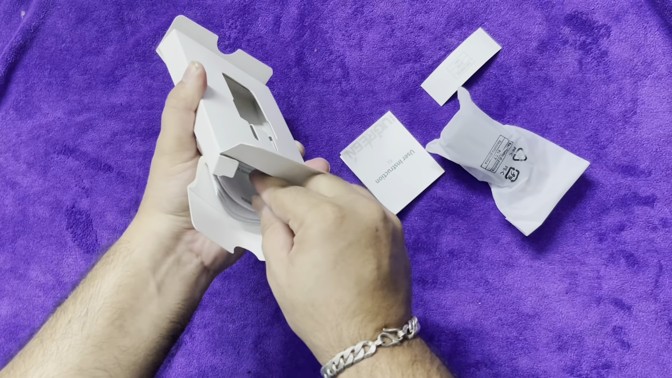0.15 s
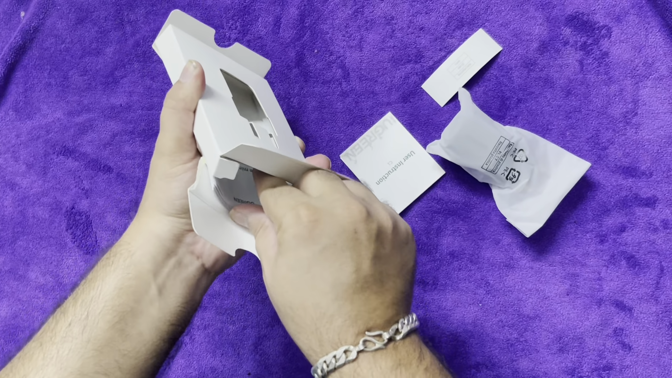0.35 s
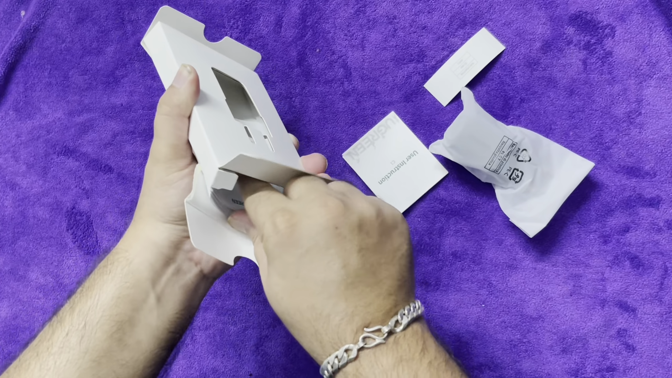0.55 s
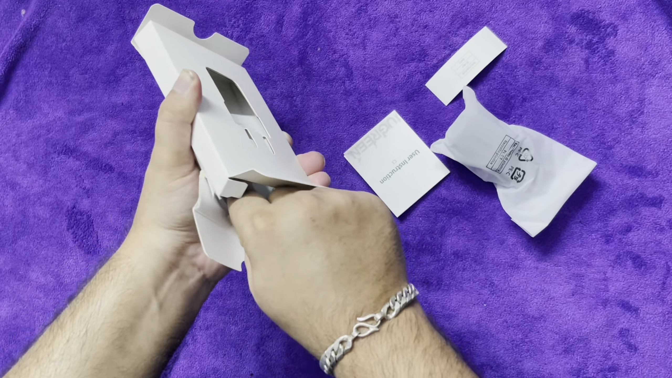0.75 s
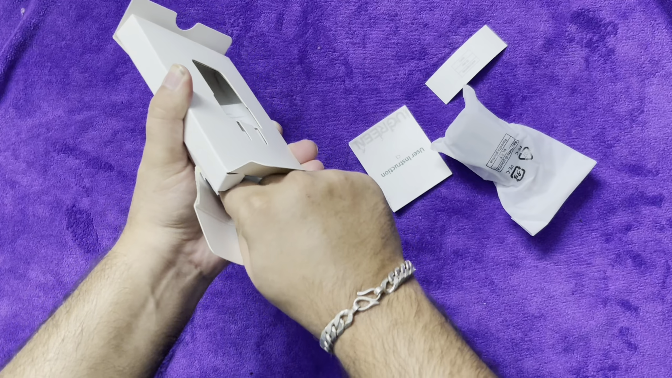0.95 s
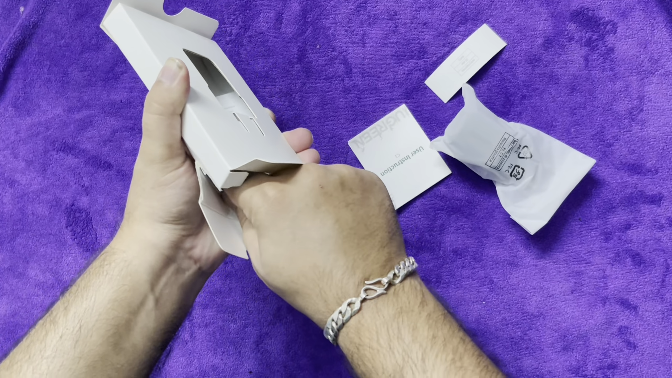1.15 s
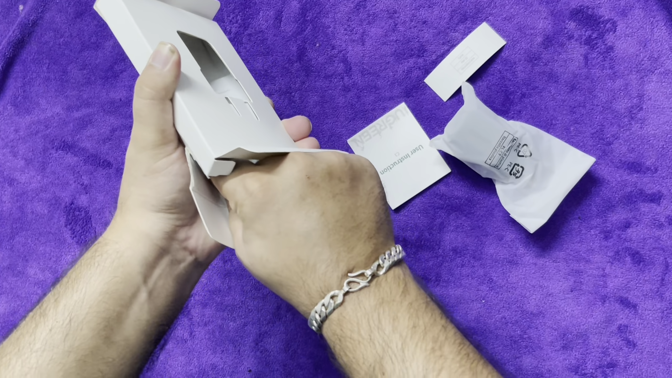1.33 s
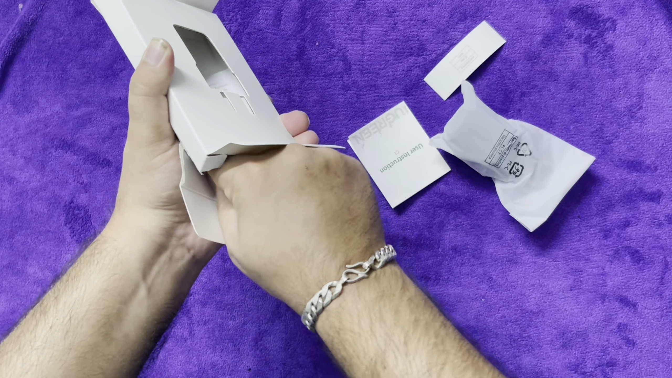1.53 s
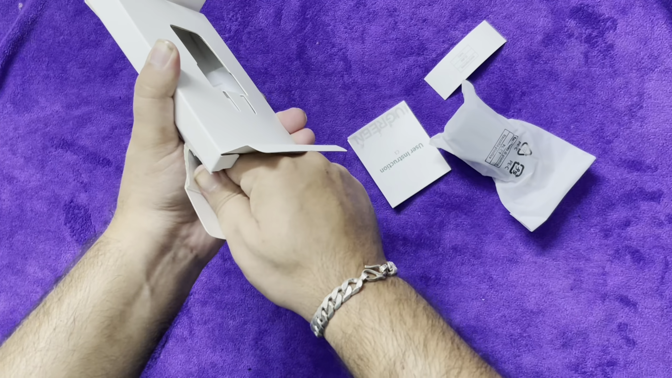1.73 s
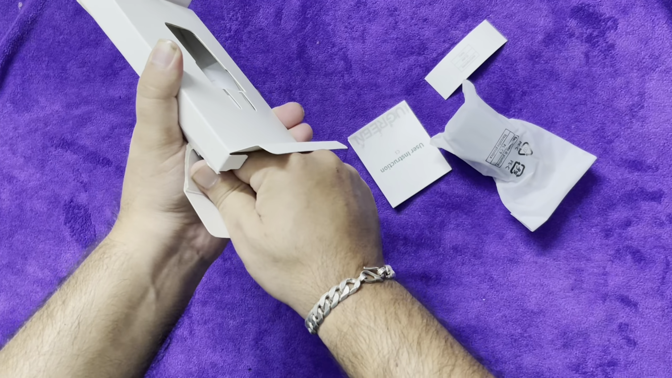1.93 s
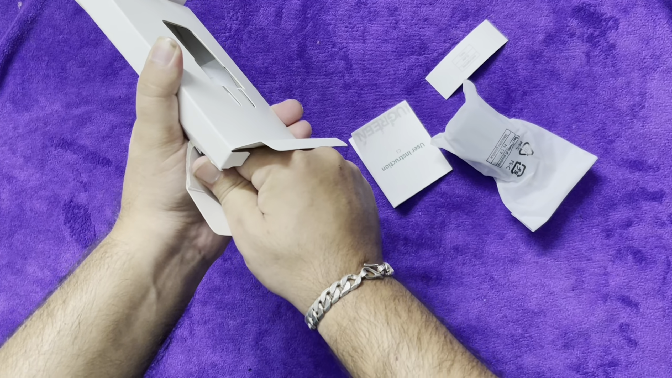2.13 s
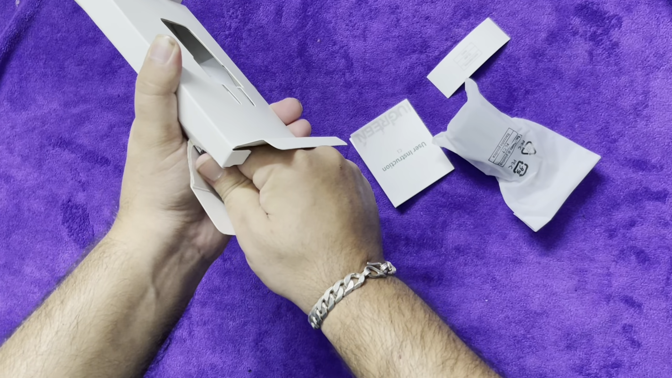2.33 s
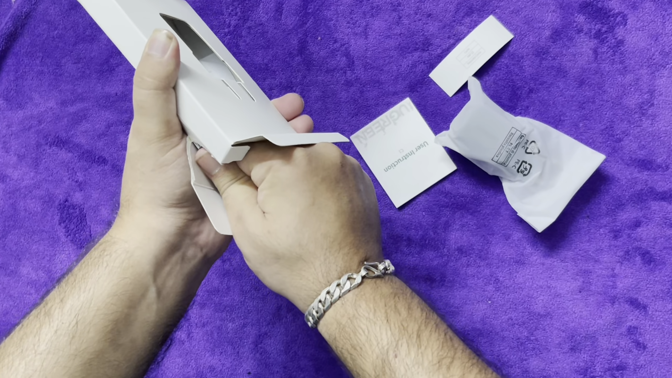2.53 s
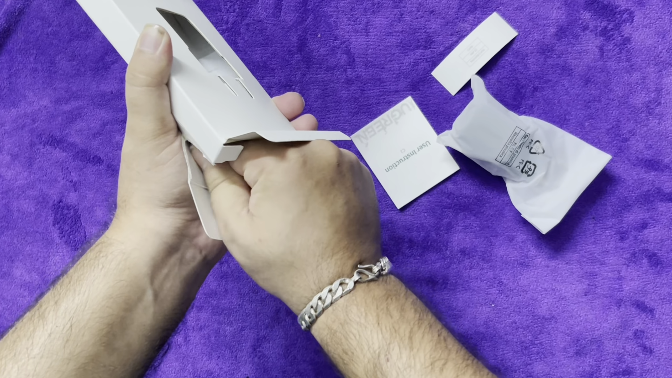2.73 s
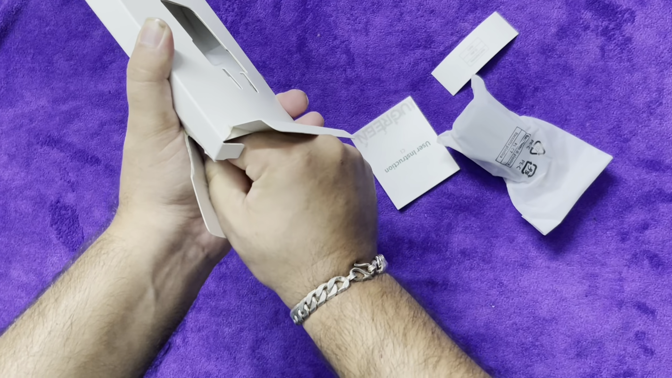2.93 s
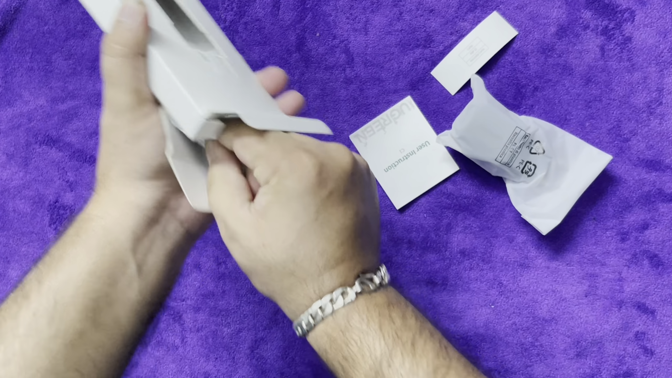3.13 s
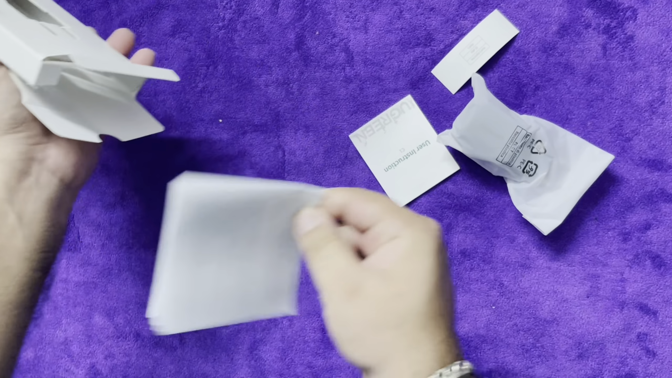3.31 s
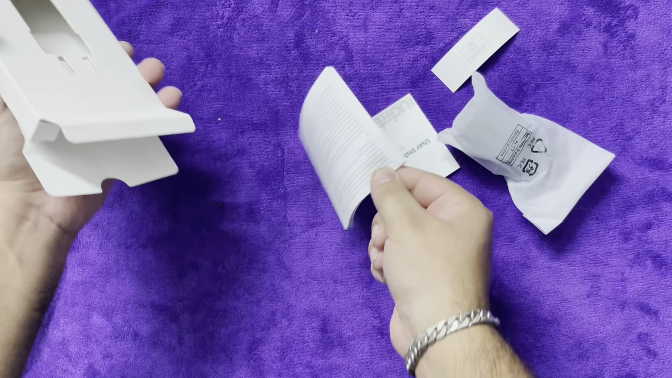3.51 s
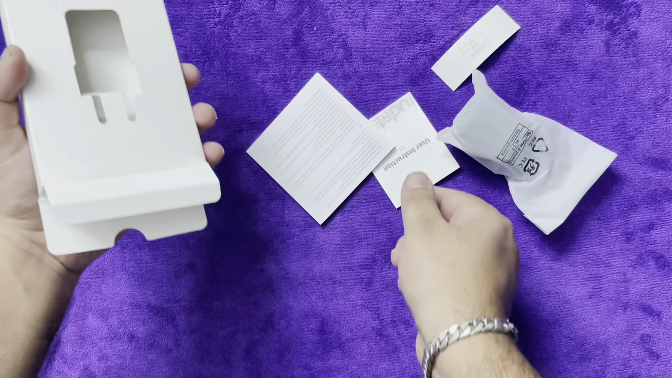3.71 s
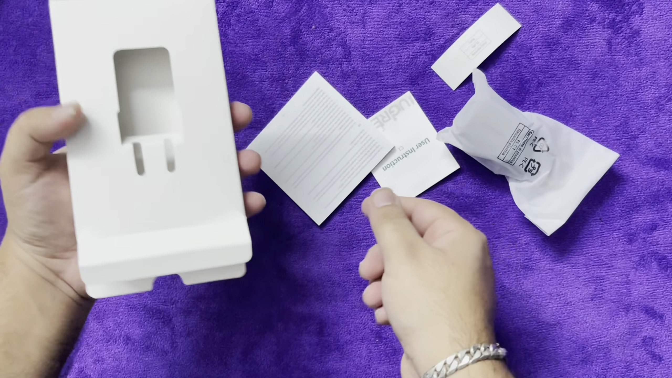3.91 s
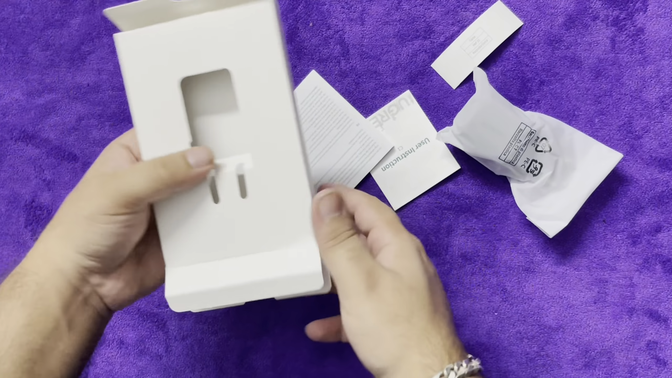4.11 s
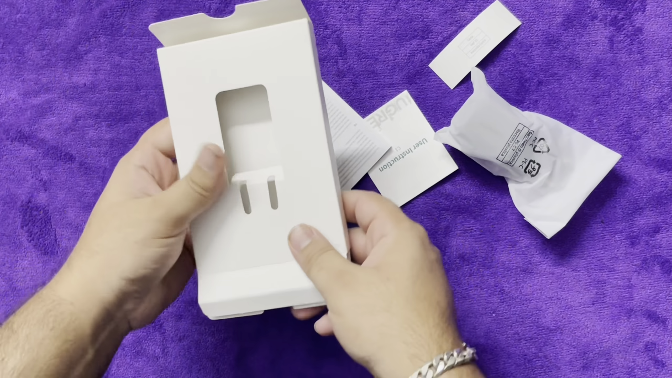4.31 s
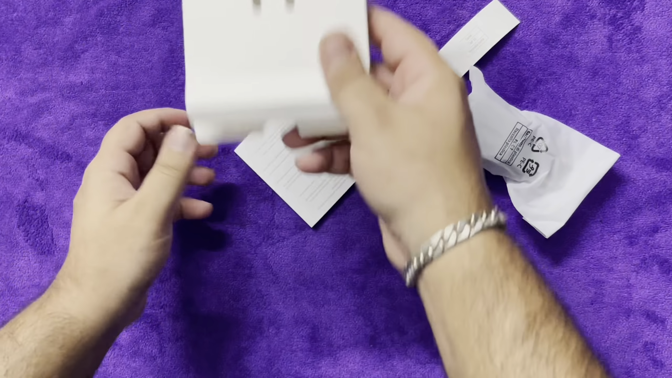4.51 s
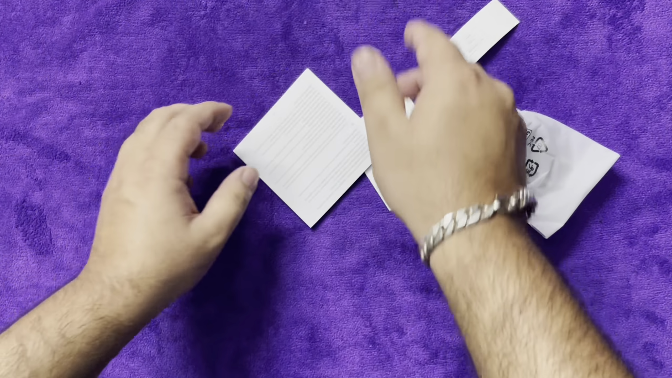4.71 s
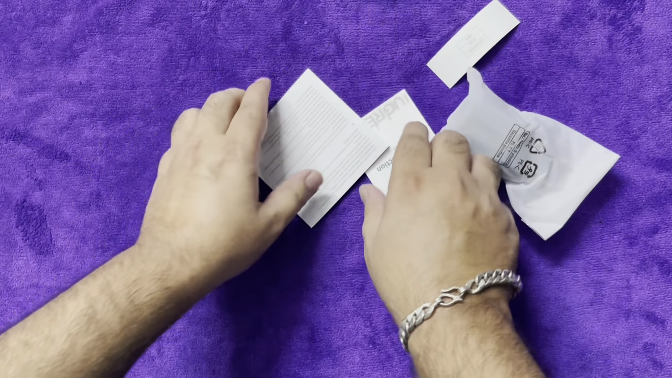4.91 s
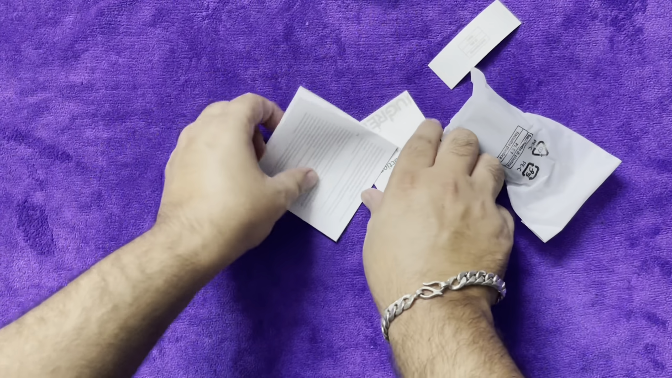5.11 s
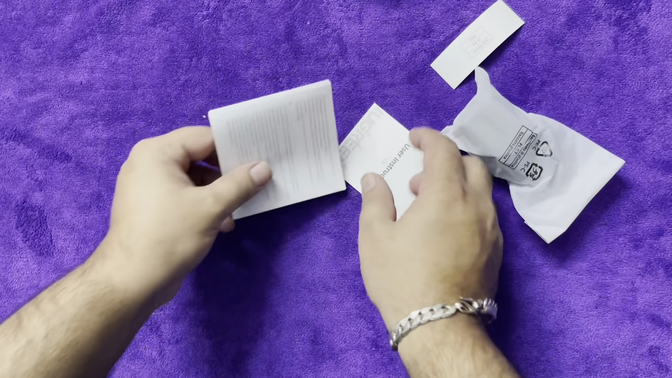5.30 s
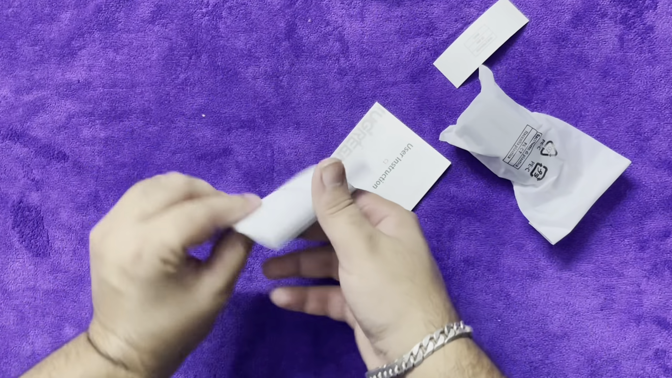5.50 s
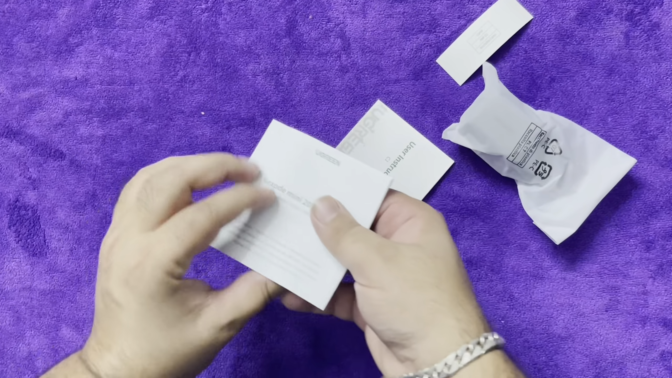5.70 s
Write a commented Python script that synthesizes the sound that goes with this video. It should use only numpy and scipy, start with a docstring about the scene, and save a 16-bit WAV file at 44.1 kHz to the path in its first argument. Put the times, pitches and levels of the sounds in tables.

```python
"""In a quiet room, hands work a folded leaflet out of a thin cardboard tray and drop the tray on a table.
Sliding paper makes a bright hiss, fingers rub and bump the card, and the handling makes a low rumble.
The card creaks in tiny slips that sound as ticks; a flap scrapes and an edge squeaks as they drag.
The hollow tray lands with a deep thud and rings at each hit as it rocks and settles.
The walls echo faintly; the background hum fades away and cuts back in about a second from the start."""
import sys
import numpy as np
from scipy import signal
from scipy.fft import rfft, irfft
from scipy.io import wavfile
from scipy.ndimage import uniform_filter1d

SR = 44100
rng = np.random.default_rng(int(sys.argv[2]) if len(sys.argv) > 2 else 0)


def waveform_to_disk(signal):
    """Save audio, clipped to [-1, 1], as 16-bit WAV at the path in sys.argv[1]."""
    frames = np.transpose(np.atleast_2d(signal))
    scaled = np.clip(frames, -1, 1) * 32767
    samples = np.round(scaled).astype(np.int16)
    wavfile.write(sys.argv[1], SR, samples)


N = 253557

# paper slides that swell and die away: peak t/s, level/dB, hiss f/Hz, 20 dB rise/s, 20 dB fall/s
PAPER_STROKES = [(.17, -56.5, 8400, 0.033, .08), (.26, -55.5, 11000, .06, 0.075),
                 (.385, -61, 10400, 0.046, .03), (.428, -45, 9650, .008, 0.044),
                 (.476, -38, 9000, 0.018, .075), (1.07, -59.5, 8760, 0.033, .15),
                 (1.32, -60, 8840, .015, .1), (1.46, -55.5, 10100, .1, .08),
                 (1.66, -63, 9400, 0.082, 0.041), (1.82, -58.5, 9350, .1, 0.063),
                 (1.93, -49.5, 9000, 0.024, 0.049), (2.0, -47, 9050, 0.043, .03),
                 (2.03, -48, 9010, 0.032, 0.042), (2.18, -51.5, 8800, 0.065, 0.068),
                 (2.265, -47, 8900, .015, 0.15), (2.44, -62, 10300, .03, .1), (2.55, -59, 10300, .1, .2),
                 (2.775, -46.5, 9350, 0.053, .09), (2.974, -49.5, 10300, .07, 0.074),
                 (3.078, -52, 9900, 0.026, 0.091), (3.245, -44.5, 10700, 0.045, .05),
                 (3.308, -28, 10560, .055, .065), (3.65, -61, 8900, .03, .08), (4.06, -62, 9600, .1, 0.089),
                 (4.19, -50.5, 11600, .06, 0.084), (4.5, -63.5, 8400, 0.058, 0.15),
                 (4.9, -54.5, 7850, .03, 0.14), (5.26, -50, 7800, 0.034, 0.14),
                 (5.352, -46, 7900, 0.033, 0.047)]
# fingers rub the card: peak t/s, level/dB, panel ring f/Hz, 20 dB rise/s, 20 dB fall/s
RUB_STROKES = [(.06, -51.5, 2090, 0.027, 0.044), (.2, -53.5, 2260, 0.15, 0.096),
               (.29, -53.5, 2200, 0.035, 0.098), (.42, -50, 2030, 0.014, 0.051),
               (.48, -48, 4800, .012, .07), (1.09, -50.5, 1990, 0.013, 0.083),
               (1.19, -52.5, 1900, 0.047, 0.035), (1.27, -55, 1850, .04, .04),
               (1.338, -53.5, 1900, .03, 0.065), (1.448, -51.5, 2140, 0.021, .06),
               (1.58, -56, 2020, .04, 0.032), (1.644, -51, 1840, 0.011, 0.015),
               (1.71, -59, 2350, 0.013, 0.019), (1.77, -53.5, 2430, 0.027, 0.078),
               (1.94, -50.5, 1900, 0.017, 0.092), (2.174, -47.5, 2230, 0.013, 0.033),
               (2.265, -47, 2070, 0.011, 0.027), (2.3, -47.5, 1970, 0.026, 0.082),
               (2.49, -51, 1890, 0.087, 0.12), (2.62, -47, 2030, 0.11, 0.11), (2.78, -46, 2230, 0.16, .1),
               (3.24, -46, 2730, .012, 0.07), (3.31, -41, 3000, 0.047, .06), (3.66, -57, 1940, 0.076, 0.05),
               (3.875, -52, 1720, 0.027, 0.11), (4.5, -52, 1960, .02, 0.099), (4.96, -47, 1850, 0.033, .2),
               (5.26, -50.5, 2090, .05, 0.13), (5.4, -52.5, 1830, 0.11, 0.12)]
# tone of rubbed card: f/Hz, relative level/dB
RUB_SPECTRUM = [(150, -5), (250, 7.5), (1450, 1), (1650, 2.5), (2530, -1), (2810, -2.5), (3430, -8.5),
                (6000, -23), (7800, -81), (13200, -120)]
# restless fingers between the strokes: t/s, hiss level/dB, rub level/dB
RESTLESS_FINGERS = [(0, -60.5, -64), (.4, -58.5, -58), (.6, -77, -54.5), (.85, -85, -57.5),
                    (1.025, -90, -85), (1.04, -60, -65), (1.3, -66, -59), (1.7, -57.5, -70),
                    (2.1, -61, -59), (2.6, -55.5, -54.5), (2.9, -61, -53), (3.45, -66, -52.5),
                    (4.1, -61.5, -52.5), (4.4, -65, -56), (4.78, -72, -53.5), (5.1, -64, -50.5),
                    (5.45, -60, -58.5), (5.75, -62.5, -54.5)]
# card slips: t/s, crease level/dB, crease f/Hz, panel f/Hz, panel vs crease/dB, flap vs crease/dB
CARD_SLIPS = [(0.399, -34, 12000, 1400, -20, -27), (0.4133, -43, 12000, 1630, -4, -2),
              (0.4271, -24.5, 10100, 1690, -13, -11), (0.4677, -18.5, 11100, 1690, -14.5, -8.5),
              (1.034, -52, 9550, 2600, 1, -12), (1.3223, -44, 8650, 1480, 0, -22),
              (1.3354, -41.5, 8350, 1540, -2, -21), (1.3687, -40, 8400, 1670, -13, -24),
              (1.4052, -47, 11900, 2060, -8, -17), (1.4638, -37, 10800, 2100, -19, -26),
              (1.514, -42.5, 8780, 2020, -22, -20), (1.924, -39, 7900, 1680, -22, -7),
              (1.9432, -33, 10200, 1730, -7, -7), (1.9778, -28, 8750, 1780, -29, -21),
              (1.996, -22.5, 8800, 2070, -34, -18), (2.0193, -18.5, 9300, 1900, -21, -21),
              (2.1721, -26.5, 8900, 2200, -5, -11.5), (2.2544, -26.5, 8750, 1700, -3.5, -12),
              (2.2644, -34, 8900, 1206, -4, -16), (2.289, -29, 8560, 2010, -20, -21),
              (2.3196, -34, 7600, 1420, -19, -17), (2.365, -39, 11100, 1630, -14, -15),
              (2.42, -37, 10300, 1670, -4, -11), (2.4356, -33, 10300, 1680, -2, -19),
              (2.451, -32, 10400, 1740, -26, -21), (2.462, -29.5, 10400, 2390, -13, -26),
              (2.4828, -27.5, 10500, 1800, -4.5, -25), (2.4973, -29.5, 10600, 1830, -2, -31),
              (2.5334, -23.5, 10500, 1700, -22, -11), (2.5502, -24.5, 10400, 1730, -8, -7),
              (2.583, -34.5, 11100, 2030, 3, -5), (2.6156, -32.5, 10800, 1880, 4.5, -6),
              (2.636, -36, 11800, 2520, 0, -2), (2.6648, -29.5, 12000, 2680, -1.5, -13),
              (2.7013, -32.5, 11900, 2500, 2, -17), (2.7278, -39, 6850, 2530, 7.5, -11),
              (2.748, -37, 7860, 2000, 1, 6), (2.7576, -23.5, 9000, 3130, -1, -18),
              (2.786, -30.5, 8400, 2270, 5, -7), (2.803, -36, 10100, 2460, 0, -2),
              (2.9993, -32.5, 9900, 1600, -8, -29), (3.0649, -37.5, 9900, 1290, -3, -23),
              (3.0773, -28.5, 9840, 1330, -12, -27), (3.234, -34, 9500, 2680, -6, -20),
              (3.278, -18.5, 11200, 2680, -20, -11), (4.357, -50, 6600, 1260, -15, -21),
              (4.412, -44, 5740, 1260, 0, -21), (5.239, -42, 7340, 2200, 6, 3),
              (5.2599, -37, 7840, 1750, -12, 2)]
# an edge chatters in runs of slips: start t/s, length/s, slip rate/Hz, level/dB, crease f/Hz
CHATTER_RUNS = [(2.128, 0.092, 100, -36.5, 9300), (3.02, .045, 110, -47, 9600)]
# the tray is knocked, then lands: t/s, ring level/dB, crack vs ring/dB, contact/s, hardness (0 is soft)
TRAY_HITS = [(0.273, -39, -18, .004, 0.89), (1.334, -39.5, -35, .004, 0.46), (1.446, -40, -25, .003, 0.86),
             (1.48, -43.5, -25, 0.0037, 1.1), (1.643, -47, -29, .004, 0.79), (1.836, -41, -23, 0.004, 1.08),
             (2.253, -25.5, -12, 0.0022, 0.61), (2.266, -38, -15, .008, 0.54),
             (2.289, -40, -15, .005, 0.71), (4.7862, -23.5, -45, 0.005, 1.9),
             (4.795, -19, -35, 0.0038, 0.2), (4.804, -1.5, -48, 0.0031, 0.083),
             (4.815, -17, -28, 0.003, 0.62), (4.8225, -6.5, -35, 0.0018, 1.1),
             (4.828, -9, -32, 0.001905, 0.62), (4.838, -10, -37, 0.0012, 0.82),
             (4.84, -4.5, -28, 0.002, 1.15), (4.851, -18, -7, 0.003, 0.1), (4.858, -18, -8, .004, 0.37),
             (4.873, -23.5, -11, .006, 0.63), (4.9, -20.5, -33, 0.00455, .05)]
# the tones the tray rings at: f/Hz, width/Hz, relative level/dB
TRAY_RINGS = [(488, 45, 2), (578, 93, -2.5), (900, 79, 8.5), (986, 82, 4.5), (1135, 150, -6),
              (1360, 94, -8), (1675, 110, 4.5), (1990, 200, 6.5), (2334, 190, 7), (2630, 170, 4.5),
              (4150, 170, -33), (5750, 130, -6)]
# fingers bump the hollow tray: t/s, level/dB, f/Hz, time to fade by 60 dB/s
FINGER_BUMPS = [(0.268, -44.5, 653, 0.12), (1.032, -47, 68, 0.042), (1.088, -44.5, 702, 0.11),
                (1.119, -41.5, 613, 0.043), (1.45, -43, 128, 0.033), (1.597, -39, 188, 0.032),
                (1.644, -43.5, 88, 0.047), (1.919, -38, 104, 0.032), (2.018, -37, 195, 0.037),
                (2.256, -36, 61, 0.045), (2.268, -38.5, 167, 0.027), (2.283, -33.5, 79, 0.061),
                (2.309, -33, 63.5, 0.04), (2.72, -32, 192, 0.04), (2.76, -34, 165, 0.029),
                (2.898, -42.5, 668, 0.055), (3.42, -36.5, 312, 0.05), (4.048, -42, 192, 0.024),
                (5.269, -37, 175, 0.037)]
# a flap scrapes inside the tray: t/s, level/dB, brightness/(dB per octave)
FLAP_SCRAPE = [(0.63, -86, 2), (0.656, -52.5, 4), (0.668, -62, 5), (0.69, -49, 4), (0.816, -51, -4.5),
               (0.862, -62, 1), (0.9, -75, -4.5)]
# the tones the flap rings at: f/Hz, width/Hz, relative level/dB
FLAP_RINGS = [(1500, 250, -5), (2900, 280, -1.5), (3680, 390, -4.5), (6000, 750, -6.5), (8250, 460, -10),
              (10300, 1200, -5), (12250, 1400, 0.5)]
# a dragging edge squeaks: t/s, level/dB, f/Hz, length/s
EDGE_SQUEAKS = [(0.424, -34.5, 3860, 0.011), (0.438, -49.5, 3880, 0.048), (2.257, -52.5, 4230, 0.052),
                (2.47, -60, 3470, 0.37), (3.232, -39.5, 2700, 0.024), (3.295, -43, 2410, 0.037),
                (5.243, -53, 4050, 0.033)]
# low rumble of handling, with the tray's landing thud at 4.91 s: t/s, level/dB
RUMBLE_LEVELS = [(0, -51.5), (.14, -58.5), (.35, -58), (.77, -81), (1.07, -62), (1.4, -50.5), (1.62, -57),
                 (2.13, -54.5), (2.69, -57.5), (2.8, -63), (3.44, -54.5), (4.05, -58), (4.56, -66),
                 (4.76, -51), (4.91, -34), (4.98, -51), (5.3, -48.5), (5.75, -62)]
# tone of the rumble and thud: f/Hz, relative level/dB
RUMBLE_SPECTRUM = [(15, -20), (45, 0), (110, -3), (260, -12), (500, -40)]
# how long the walls echo: f/Hz, time to fade by 60 dB/s
ECHO_TIMES = [(200, 0.16), (1000, 0.22), (4000, 0.27), (12000, 0.072)]
# tone of the room hum: f/Hz, relative level/dB
HUM_SPECTRUM = [(12, -30), (20, 1), (65, -4), (130, -23), (228, 1), (270, -15.5), (399, -0.5), (434, -16.5),
                (718, -1.5), (802, -15), (1330, -11), (2080, -16.5), (5080, -26.5), (10800, -30),
                (16000, -32.5)]
# the background fades out and cuts back in at 1.03 s; elsewhere it wavers: t/s, level change/dB
BACKGROUND_LEVELS = [(0, -3), (.55, 0.5), (0.848, -2), (1.0, -8), (1.025, -11), (1.036, -2.5), (1.3, 1),
                     (1.55, -5.5), (1.9, -4), (2.1, -1.5), (2.5, -1), (3.5, 0.5), (4.5, -2), (5.0, 2),
                     (5.4, -1), (5.75, -5.5)]
# how the microphone colours the sound: f/Hz, gain/dB
MIC_RESPONSE = [(20, 2.5), (3500, 0.5), (5200, -2), (7000, -1), (15000, -3), (16000, -16)]


def paper_hiss():
    """Fibres catch as the paper slides, making a bright hiss whose pitch moves with each stroke."""
    rest_hz = 8700
    stroke_gain, hz = strokes(PAPER_STROKES, rest_hz)
    fibres = grit(per_s=390, spread_db=-4)
    broad = unit_rms(resonate(resonate(fibres, hz, 7500), hz, 14000))
    # a sliding sheet rings at the centre of its hiss and a little above
    slide = broad + .8 * unit_rms(resonate(broad, hz, 900))
    slide += .4 * unit_rms(resonate(broad, 1.28 * hz, 1100))
    fidget = amp(curves(RESTLESS_FINGERS)[0]) * unit_rms(resonate(fibres[::-1], rest_hz, 8000))
    return pass_band(stroke_gain * unit_rms(slide) + fidget, "high", 5000)


def card_ticks():
    """Each slip of the card is a burst of a few milliseconds that rings a crease, a panel and the flap."""
    out, slips = np.zeros(N), CARD_SLIPS + edge_chatter()
    t = np.arange(2500) / SR - .0012  # zero at the top of the burst
    decay = np.exp(-t / .002) + .045 * np.exp(-t / .016)
    shape = np.where(t < 0, np.exp(-(t / .00088) ** 2), decay)
    snap = 2.2 * np.exp(-(t / .00002) ** 2)  # the fibres let go all at once
    for s, db, hz, panel_hz, panel_db, flap_db in slips:
        burst = rng.standard_normal(len(t)) * shape + snap
        crease = resonate(resonate(burst, hz, 1300), hz, 6000)
        panel = resonate(resonate(burst, panel_hz, 630), panel_hz, 3200)
        flap = resonate(resonate(burst, 3310, 770), 4550, 1800)
        add(out, s, peaked(tray_echo(crease, delay_s=.00042, gain=.4), db))
        add(out, s, peaked(panel, db + panel_db))
        add(out, s, peaked(flap, db + flap_db))
    return out


def edge_chatter():
    """An edge slips almost evenly, swelling and fading; each slip becomes one more row of ticks."""
    panel_hz, panel_db, flap_db, jitter_s = 1900, -18, -22, .0008
    rows = []
    for start, length, per_s, db, hz in CHATTER_RUNS:
        for s in np.arange(0, length, 1 / per_s):
            swell_db = -5 * (2 * s / length - 1) ** 2 + 1.5 * rng.standard_normal()
            when = start + s + jitter_s * rng.standard_normal()
            rows.append((when, db + swell_db, hz * rng.uniform(.92, 1.06), panel_hz, panel_db, flap_db))
    return rows


def tray_echo(x, delay_s, gain):
    """A quick echo off the far side of the tray boosts some high tones and weakens others."""
    delay = round(delay_s * SR)
    return x + gain * np.pad(x, (delay, 0))[:len(x)]


def tray_knocks():
    """Each hit is a push plus a rattle that sets the tray ringing, with a bright crack on top."""
    out, t = np.zeros(N), np.arange(5000) / SR
    for s, db, crack_db, length, hardness in TRAY_HITS:
        rattle = rng.standard_normal(len(t))
        shape = t / length * np.exp(-t / length)
        push = 3 * (1 - np.clip(hardness, 0, 1)) * np.exp(-((t - length) / .00018) ** 2)
        force = rattle * shape - push
        db_per_octave = 4.3 * (hardness - 1.23)  # harder hits reach the higher tones
        ring = sum(amp(level + db_per_octave * np.log2(hz / 900)) * resonate(force, hz, width)
                   for hz, width, level in TRAY_RINGS)
        # thin card gives off little bass and muffles its own treble
        ring = pass_band(pass_band(ring, "high", 400), "low", 3600)
        crack = resonate(rattle * (shape + .11 * np.exp(-t / .048)), 6400, 9000)
        add(out, s, peaked(ring, db))
        add(out, s, peaked(crack, db + crack_db))
    return out


def finger_bumps():
    """A soft finger blow starts gently and rings low, with a higher tone that dies sooner."""
    out, t = np.zeros(N), np.arange(8000) / SR
    for s, db, hz, fade_s in FINGER_BUMPS:
        rise, fall = 1 - np.exp(-t / .0048), amp(-60 * t / fade_s)
        ring = np.sin(2 * np.pi * hz * t) + .44 * fall * np.sin(2 * np.pi * 2.47 * hz * t)
        add(out, s, peaked(ring * rise * fall, db))
    return out


def card_rub():
    """Fingers rub the card in uneven puffs of noise that ring the panel under them."""
    stroke_gain, panel_hz = strokes(RUB_STROKES, rest_hz=1880)
    friction = noise(RUB_SPECTRUM, patchy_db=3.5)
    puffs = uniform_filter1d(abs(grit(per_s=48, spread_db=4)), 300)
    rub = unit_rms(friction * puffs)
    panel = unit_rms(resonate(rub, panel_hz, 1000))
    fidget = amp(curves(RESTLESS_FINGERS)[1]) * rub[::-1]
    return stroke_gain * unit_rms(rub + .41 * panel) + fidget


def flap_scrape():
    """The flap sticks and slips unevenly; each slip is a puff of noise that makes it ring."""
    db, db_per_octave = curves(FLAP_SCRAPE)
    slip_hz = 85 * (1 + 11 * uniform_filter1d(rng.standard_normal(N), 600))
    slip_phase = (np.cumsum(slip_hz) / SR) % 1
    drag = rng.standard_normal(N) * (.13 + np.exp(-slip_phase / .35))
    ring = np.zeros(N)
    for hz, width, level in FLAP_RINGS:
        tone = unit_rms(resonate(resonate(drag, hz, width), hz, 2 * width))
        ring += amp(level + db_per_octave * np.log2(hz / 6000)) * tone
    touching = np.interp(np.arange(N) / SR, [.62, .65, .86, .92], [0, 1, 1, 0])
    return touching * amp(db) * unit_rms(ring)


def edge_squeaks():
    """A dragging edge squeaks when its rubbing noise is held in one narrow ring."""
    out = np.zeros(N)
    for s, db, hz, length in EDGE_SQUEAKS:
        friction = rng.standard_normal(SR // 2)
        ring = resonate(resonate(friction, hz, 230), hz, 480)[-round(length * SR):]
        add(out, s, amp(db) * unit_rms(ring) * signal.windows.tukey(len(ring), .6))
    return out


def rumble_and_thud():
    """Low rumble of handling, with a deep thud as the tray lands."""
    return amp(curves(RUMBLE_LEVELS)[0]) * noise(RUMBLE_SPECTRUM, patchy_db=0)


def wall_echo(x):
    """Sound bounces off the walls many times, and each pitch range fades at its own speed."""
    bounces = np.zeros(SR // 2)
    at = np.arange(200, len(bounces) - 20, 20)
    bounces[at + rng.integers(0, 20, len(at))] = rng.choice([-1., 1.], len(at))
    hz, t, spectra = signal.stft(bounces, SR, nperseg=256)
    fade = amp(-60 * t / at_pitch(ECHO_TIMES, hz)[:, None])
    tail = signal.istft(spectra * fade, SR, nperseg=256)[1]
    return signal.fftconvolve(x, tail / np.linalg.norm(tail))[:N]


def background_hum(level_db):
    """The whole background fades out and cuts back in at 1.03 s; elsewhere the hum wavers."""
    return amp(level_db + curves(BACKGROUND_LEVELS)[0]) * noise(HUM_SPECTRUM, patchy_db=1)


def strokes(rows, rest_hz, sharpness=1.8):
    """Gives the gain of all strokes together, and a pitch that follows the strongest one."""
    t = np.arange(0, N + 64, 64) / SR
    s, db, hz, rise, fall = np.transpose(rows)[:, :, None]
    from_peak = np.where(t < s, (s - t) / rise, (t - s) / fall)
    power = amp(db - 20 * from_peak ** sharpness) ** 2
    pitch = ((power * hz).sum(0) + 1e-9 * rest_hz) / (power.sum(0) + 1e-9)
    return [np.interp(np.arange(N) / SR, t, c) for c in (np.sqrt(power.sum(0)), pitch)]


def grit(per_s, spread_db):
    """Catching fibres make scattered clicks of uneven size over fine noise."""
    clicks = amp(spread_db * np.minimum(rng.exponential(1, N), 5)) * (rng.random(N) < per_s / SR)
    return unit_rms(rng.standard_normal(N) * (1 + signal.lfilter([1], [1, -.97], clicks)))


def noise(spectrum, patchy_db):
    """Makes noise of a given tone, with drifting louder and softer patches."""
    real, imag, patches = rng.standard_normal((N // 256 + 5, 513, 3)).T
    patches = unit_rms(uniform_filter1d(uniform_filter1d(patches, 12, 0), 12, 1))
    db = at_pitch(spectrum, np.fft.rfftfreq(1024, 1 / SR))[:, None] + patchy_db * patches
    return unit_rms(signal.istft((real + 1j * imag) * amp(db), nperseg=1024, noverlap=768)[1][:N])


def resonate(x, hz, width):
    """Makes a sound ring at hz: shifts that pitch down to zero, smooths, and shifts back."""
    turn = np.exp(2j * np.pi * np.cumsum(hz * np.ones(len(x))) / SR)
    decay = np.exp(-np.pi * width / SR)
    return 2 * (turn * signal.lfilter([1 - decay], [1, -decay], x / turn + 1e-18)).real


def pass_band(x, side, hz):
    """Keeps the "low" or the "high" side of hz."""
    return signal.sosfilt(signal.butter(2, hz, side, fs=SR, output="sos"), x)


def curves(rows):
    """Joins the points of a time table into one curve per column."""
    s, *columns = np.transpose(rows)
    return [np.interp(np.arange(N) / SR, s, c) for c in columns]


def at_pitch(points, hz):
    """Looks up a table at the given frequencies."""
    f, value = np.transpose(points)
    return np.interp(np.log(hz + 1), np.log(f + 1), value)


def amp(db):
    """Turns decibels into gain."""
    return 10 ** (np.asarray(db) / 20)


def unit_rms(x):
    """Scales a sound to an average strength (rms) of 1."""
    return x / np.sqrt(np.mean(x ** 2) + 1e-20)


def peaked(x, db):
    """Scales a sound to a peak level."""
    return amp(db) * x / abs(x).max()


def add(mix, s, sound):
    """Lays a sound into the mix at s seconds."""
    part = mix[round(s * SR):][:len(sound)]
    part += sound[:len(part)]


def scene():
    """Hands and tray are close by, with the room around them."""
    hits = card_ticks() + edge_squeaks() + finger_bumps() + tray_knocks()
    room = background_hum(level_db=-53) + amp(-12) * wall_echo(hits)
    handling = paper_hiss() + card_rub() + rumble_and_thud()
    return (hits + handling + flap_scrape() + room)[None]


def record(dry):
    """The microphone lifts the bass a little and softens the treble; the very top is cut off."""
    coloured = irfft(rfft(dry) * amp(at_pitch(MIC_RESPONSE, np.fft.rfftfreq(N, 1 / SR))), N)
    top_hz = 15900
    low_pass = signal.firwin(301, top_hz, window=("kaiser", 11), fs=SR)
    return signal.oaconvolve(coloured, low_pass[None], "same")


dry = scene()
out = record(dry)
waveform_to_disk(out)
```